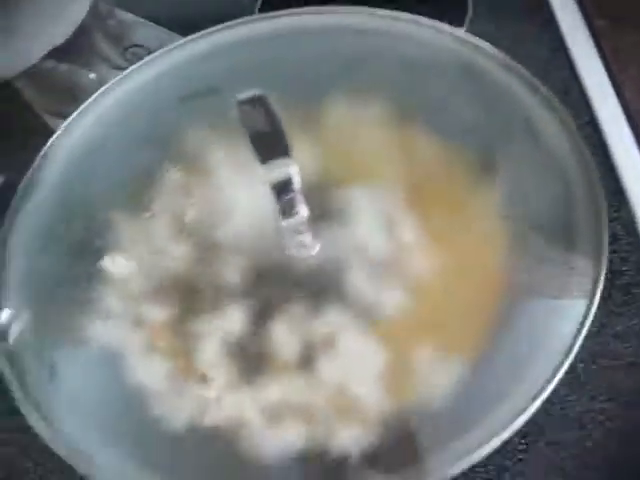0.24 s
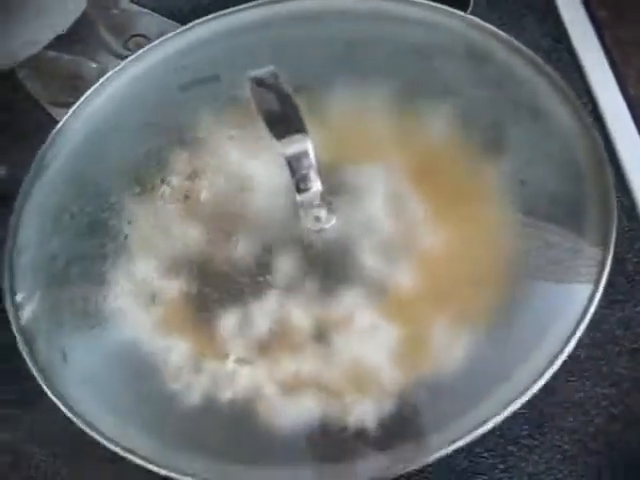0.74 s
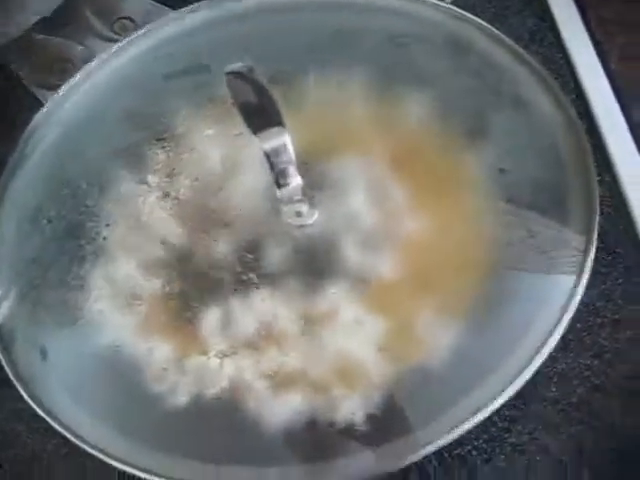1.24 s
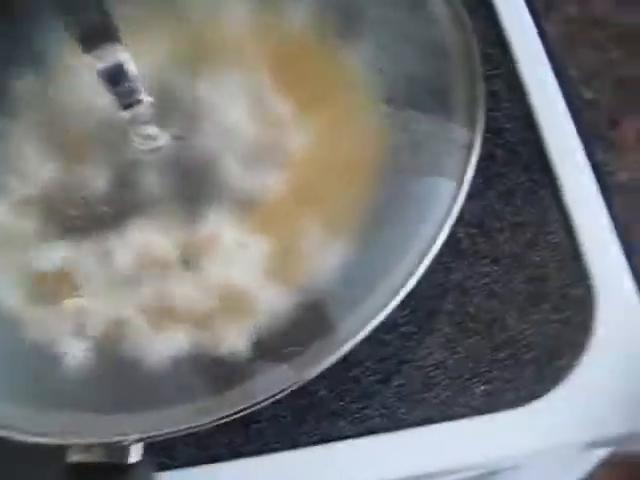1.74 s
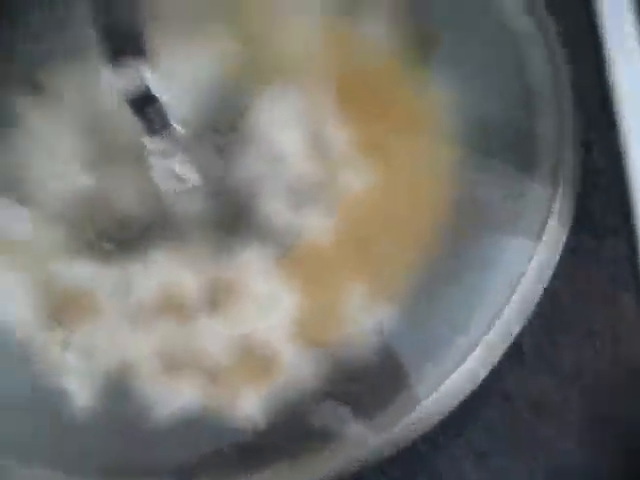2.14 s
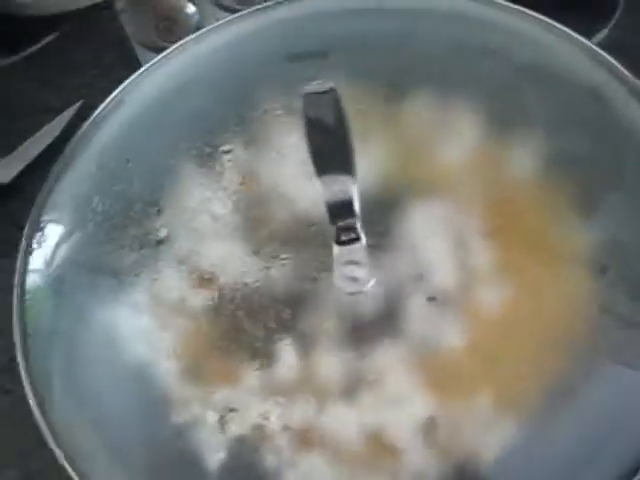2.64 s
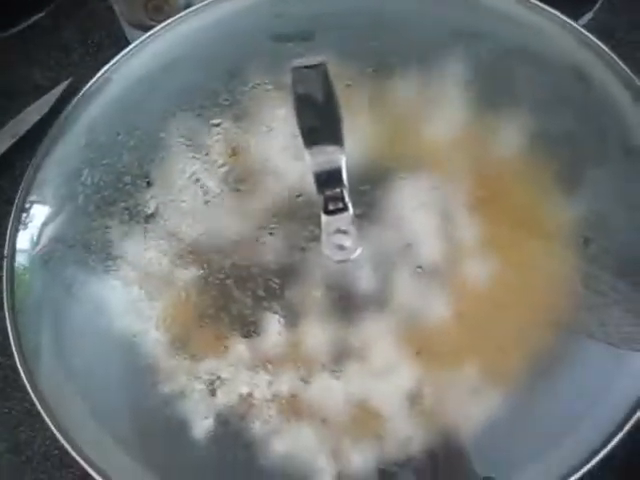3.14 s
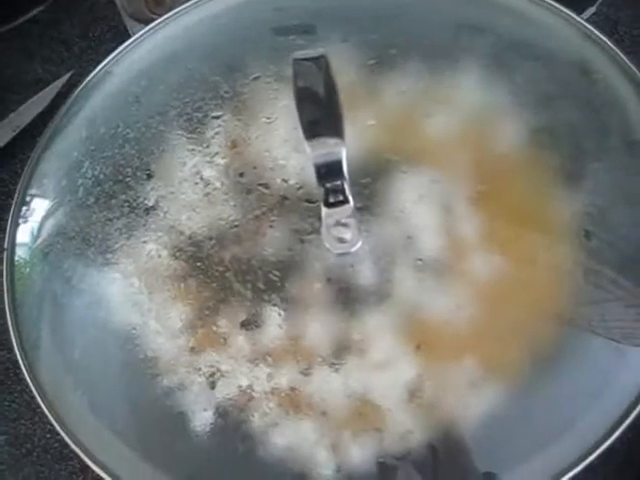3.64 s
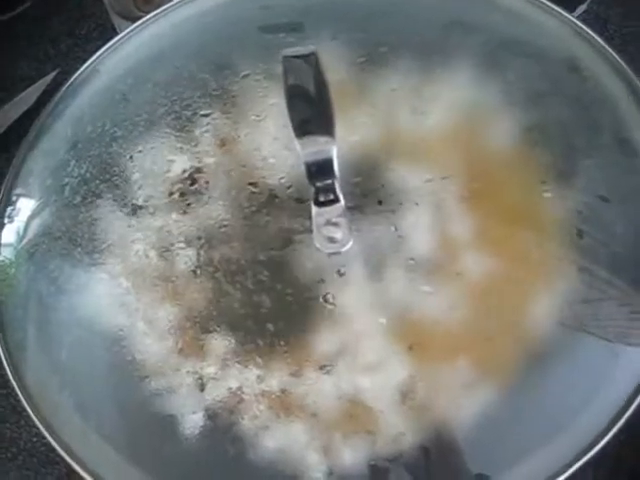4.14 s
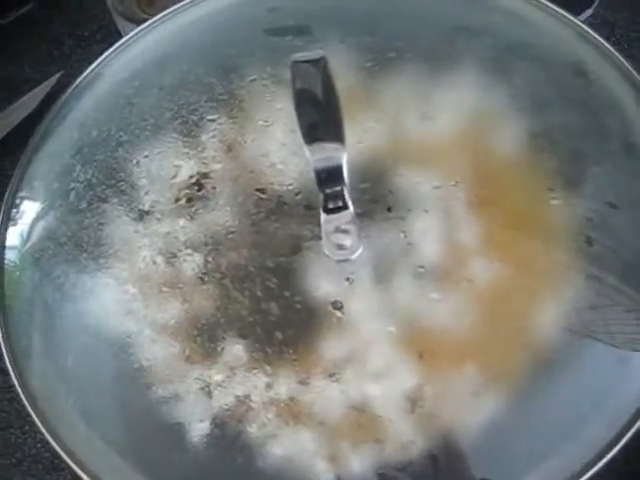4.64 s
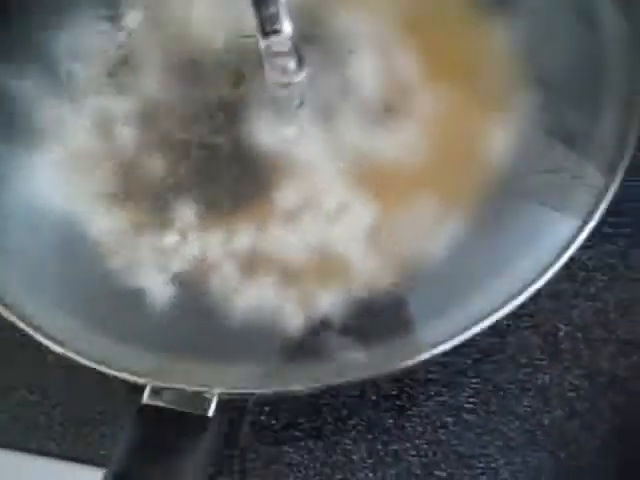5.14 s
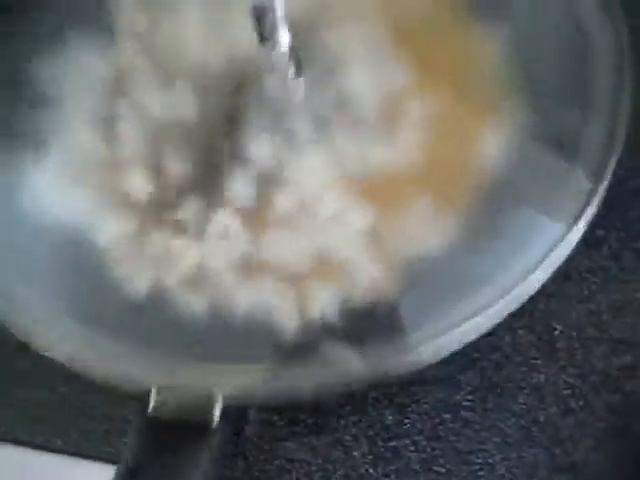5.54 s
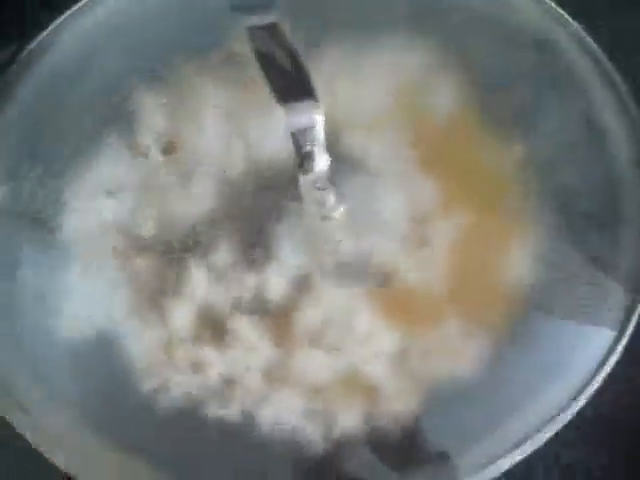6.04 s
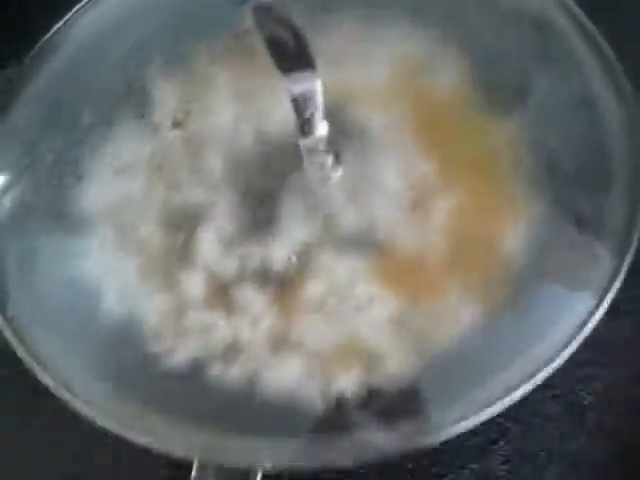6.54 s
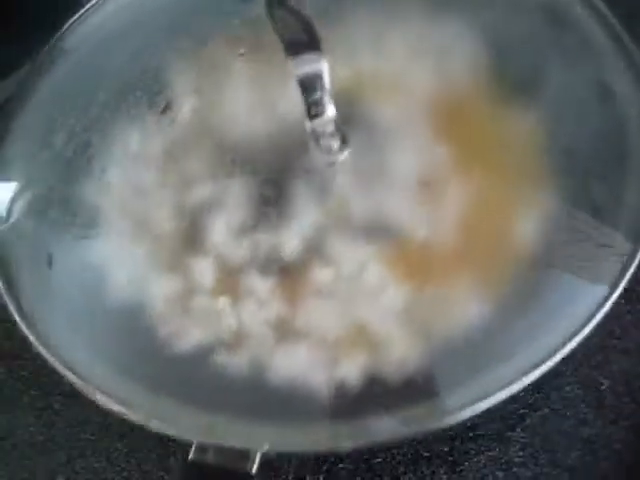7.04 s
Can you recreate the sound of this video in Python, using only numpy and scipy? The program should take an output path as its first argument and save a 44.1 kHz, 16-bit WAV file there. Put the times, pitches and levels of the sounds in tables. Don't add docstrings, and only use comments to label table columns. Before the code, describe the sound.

Popcorn bursts inside a lidded pan on a stove, heard very close in a small kitchen. Sharp dry pops and hard ticking knocks come in irregular clusters, with glassy lid rattle and brief metallic pings. The heap scrapes grainily as the pan is shaken, most heavily in the last two seconds. Thin oil hiss and very faint hum lie beneath, exposed during a lull around four and a half seconds. Loud hits sound slightly clipped.

```python
import sys
import numpy as np
from scipy import signal
from scipy.fft import rfft, irfft
from scipy.io import wavfile
from scipy.ndimage import uniform_filter1d

SR = 44100
rng = np.random.default_rng(int(sys.argv[2]) if len(sys.argv) > 2 else 0)


def convert_level_to_amplitude(level_db):
    exponent = np.asarray(level_db, float) / 20
    return 10 ** exponent


def waveform_to_disk(signal):
    frames = np.transpose(np.atleast_2d(signal))
    scaled = np.clip(frames, -1, 1) * 32767
    samples = np.round(scaled).astype(np.int16)
    wavfile.write(sys.argv[1], SR, samples)


N = 321930

# frequency in Hz, level in dB.
HISS_SPECTRUM = [(30, -4), (90, -4), (125, -5), (200, 0.5), (400, 3), (900, 1.5), (1700, -3.5), (3000, 1.5),
                 (6100, -2), (6700, -6), (7700, -5.5), (10800, -2), (11900, -9), (15500, -12)]
# frequency in Hz, level in dB.
STEADY_TONES = [(59.4, -59.5), (119.5, -67.5), (152, -75), (533, -60), (7560, -57), (7853, -58),
                (7882, -59)]
# start in seconds, peak in dB, pitch in Hz.
BASE_BUMPS = [(0.349, -44, 680), (5.169, -52, 297), (5.419, -36, 414), (5.689, -31, 637),
              (5.761, -39.5, 239), (5.911, -36, 218), (6.029, -34, 418), (6.349, -42, 437),
              (6.45, -48, 166), (6.908, -47, 230), (6.991, -40, 675)]
# peak time in seconds, half length in seconds, scrape in dB,
# centre in Hz, rumble of the base in dB.
HEAP_SLIDES = [(0.0, 0.16, -22, 1220, -44), (0.119, 0.076, -25, 1950, -50), (0.35, 0.2, -23.5, 1510, -38),
               (0.571, 0.12, -17.5, 1610, -57), (0.823, 0.097, -21.5, 1710, -57),
               (0.894, 0.043, -53, 1390, -63), (0.98, 0.11, -31.5, 1440, -45), (1.375, 1, -40, 1840, -64),
               (2.003, 0.29, -34, 1390, -50), (2.386, 0.072, -22.5, 1640, -41),
               (3.156, 0.042, -29, 1840, -45), (3.306, 0.12, -28.5, 1860, -39),
               (3.497, 0.18, -35, 2070, -51), (3.93, 0.11, -22.5, 1990, -51),
               (4.103, 0.2, -39.5, 1310, -48), (4.624, 0.11, -49, 1080, -69),
               (5.08, 0.083, -33.5, 1700, -52), (5.157, 0.062, -27.5, 1570, -43),
               (5.339, 0.17, -24.5, 1450, -34.5), (5.492, 0.17, -30.5, 1270, -38),
               (5.685, 0.16, -21.5, 1500, -37.5), (6.003, 0.48, -25.5, 1760, -38),
               (6.328, 0.2, -24.5, 1690, -35.5), (6.58, 0.14, -28, 1340, -41.5),
               (6.799, 0.095, -18.5, 1350, -31), (6.99, 0.054, -34.5, 1000, -36),
               (7.08, 0.12, -23, 1500, -36), (7.144, 0.07, -26, 1190, -37),
               (7.24, 0.081, -36.5, 2640, -47.5)]
# frequency in Hz, level in dB.
RATTLE_SPECTRUM = [(880, -4), (1500, -8.5), (2320, -2.5), (2930, -4), (3370, -3.5), (4340, -5),
                   (5930, -9.5), (12000, -30.5), (15600, -63), (22000, -120)]
# start in seconds, peak in dB, pitch in Hz.
KERNEL_TICKS = [(0.095, -6, 3000), (0.104, -6.5, 2130), (0.5056, -19, 1240), (0.5503, -17, 1190),
                (0.5596, -17, 1080), (0.604, -8, 1700), (2.3095, -14, 920), (2.393, -16, 2700),
                (2.404, -17, 2640), (2.4945, -24, 3000), (3.247, -10, 3920), (3.2716, -8, 2900),
                (3.299, -12, 2900), (3.392, -25, 2900), (3.8292, -9, 2230), (3.831, -10, 3600),
                (3.8965, -11, 2900), (3.909, -18, 2900), (3.9245, -15, 2220), (3.956, -14, 2870),
                (3.988, -23, 2550), (5.5406, -18.5, 1782), (5.617, -36, 1700), (5.622, -32, 1030),
                (5.661, -24, 1930), (5.6858, -16, 1780), (6.238, -13, 2400), (6.248, -13, 2370),
                (6.311, -21, 4220), (6.329, -24, 1380), (6.351, -13, 1980), (6.379, -19, 1890),
                (6.432, -24, 1800), (6.516, -15.5, 1270), (6.575, -23, 2010), (6.652, -19, 1750),
                (1.9765, -19.5, 2300), (1.966, -25, 945), (0.469, -20, 1510), (5.2625, -13, 3200),
                (5.364, -16, 2900), (3.2635, -32, 2080), (1.3, -16, 3000), (7.16, -19, 850),
                (7.177, -23, 2900)]
# start in seconds, peak in dB, main spot in Hz, second spot in
# Hz, 60 dB decay time in seconds.
HARD_KNOCKS = [(0.1504, 4, 2660, 1930, 0.02), (0.675, -9, 2620, 2130, 0.03), (0.678, 3, 2680, 1925, 0.052),
               (0.685, -6, 2200, 3560, 0.074), (0.695, -3, 2150, 2680, 0.065),
               (0.7005, -9, 2180, 2330, 0.05), (0.8252, 2, 1444, 1620, 0.042),
               (0.8265, -2, 895, 1457, 0.062), (1.311, -3.5, 1806, 2490, 0.058),
               (2.3718, -6, 2634, 2360, 0.071), (2.382, -3, 2610, 1680, 0.072),
               (3.2572, 3, 1930, 2050, 0.072), (3.276, -3, 1776, 2900, 0.056),
               (3.287, -3.5, 1405, 2830, 0.033), (3.451, 9, 1883, 2610, 0.021), (3.45, 0, 2700, 3740, 0.09),
               (6.0477, 10, 5150, 6100, 0.019), (6.05, 4, 5540, 2900, 0.02),
               (3.861, -8.5, 2830, 3690, 0.099), (3.913, -9, 1787, 2220, 0.19),
               (5.256, -9, 1810, 2660, 0.046), (5.718, 8, 2100, 2280, 0.02),
               (5.729, -1.5, 1486, 1990, 0.12), (5.759, -12.5, 1900, 2140, 0.19),
               (5.97, -0.5, 1860, 2750, 0.035), (6.12, -6, 2050, 4200, 0.02),
               (6.2255, -0.5, 1710, 2360, 0.025), (6.757, 2, 1815, 3400, 0.04)]
# start in seconds, peak in dB, main spot in Hz, second spot in Hz,
# clean ring in dB.
SOFT_BOUNCES = [(0.199, -9.5, 2010, 2080, -13), (0.798, -17, 1750, 2380, 7), (1.166, -11, 2140, 3200, -5),
                (1.45, -14, 1900, 1960, -21), (1.711, -6, 1580, 3040, -9.5), (2.412, -9, 1840, 2300, -2),
                (2.489, -11.5, 1600, 2960, 11), (3.02, -16, 2240, 2690, -4), (3.093, -8, 1930, 2900, -10),
                (3.152, -9.5, 2260, 2690, -5.5), (3.329, -10, 1890, 3720, -8), (3.83, -7.5, 2000, 3590, -7),
                (3.842, -6, 904, 3000, -5), (3.9466, -10, 2010, 2820, -8), (4.0552, -16.5, 1804, 2060, 10),
                (5.062, -24, 1440, 1830, 3), (5.181, -10.5, 1520, 2330, -14), (5.191, -17, 1400, 3500, -12),
                (5.291, -18, 2900, 3200, -5), (5.341, -8, 890, 2220, -2), (5.38, -10, 1820, 2110, -2),
                (5.394, -9, 920, 1800, -6), (5.419, -9, 1755, 2110, -4), (5.454, -13.5, 1787, 2550, 1),
                (6.297, -11, 1090, 2060, -2), (6.534, -12.5, 1350, 1350, -3), (6.599, -15.5, 1330, 2000, 1),
                (6.743, -5, 1720, 2450, -7), (6.783, -10.5, 1360, 2720, 8), (6.809, -15, 1210, 1970, -1),
                (6.825, -10.5, 1260, 2520, -9), (6.842, -10, 1960, 2550, -1), (6.92, -16.5, 900, 990, -1),
                (6.993, -19, 670, 1580, 1), (7.076, -17, 694, 2290, 7)]
# start in seconds, peak in dB, centre in Hz, width in Hz,
# 60 dB decay time in seconds.
FLAKE_SHOWERS = [(0.1507, -9, 5300, 2490, 0.062), (0.6745, -6, 2320, 900, 0.025),
                 (0.683, -10, 2370, 1100, .07), (0.694, -7, 2150, 700, 0.064),
                 (0.8243, -12, 1300, 500, 0.043), (0.833, -15, 1440, 400, 0.072),
                 (2.0754, -7.5, 2000, 900, 0.046), (2.076, -20, 5530, 1800, 0.036),
                 (2.189, -13, 3820, 1000, 0.095), (2.200, -18, 3100, 1200, 0.13),
                 (3.242, -17, 3870, 500, 0.029), (3.27, -10, 3270, 1300, .06), (3.291, -19, 2800, 900, .09),
                 (3.3117, -13.5, 11300, 2500, 0.033), (3.3135, -20, 4750, 700, 0.12),
                 (3.862, -14, 2500, 1190, 0.088), (3.909, -15, 2300, 1300, 0.061),
                 (3.946, -21, 2400, 1300, .05), (5.229, -8, 3000, 2000, .06),
                 (5.257, -10, 2570, 1300, 0.052), (5.718, -5.5, 3300, 1510, 0.081),
                 (5.723, -1, 2200, 600, .02), (6.0488, -3.5, 3770, 900, 0.02),
                 (6.0529, -5, 4300, 2500, 0.02), (6.054, -16, 5600, 450, 0.17),
                 (6.057, -15, 2820, 1500, 0.13), (6.119, -13, 3000, 2000, 0.06),
                 (3.393, -27, 7000, 5000, .05), (6.2065, -22, 3000, 300, .05),
                 (6.225, -0.5, 2100, 880, 0.018), (6.228, -3, 2090, 900, .02),
                 (1.458, -21, 2500, 700, 0.092), (2.190, -20, 916, 120, 0.089),
                 (6.229, -26, 5600, 400, .05), (3.2763, -18, 2000, 500, .03),
                 (0.265, -9.5, 3000, 1500, .04)]
# frequency in Hz, level in dB, 60 dB decay time in seconds.
PAN_MODES = [(1930, -14, 0.23), (2220, -28, 0.21), (2370, -8, 0.35), (2660, -6, 0.22), (2830, 2, 0.2),
             (3530, -6, 0.21), (3720, -2, 0.12), (4540, -14, 0.3), (4530, -15, 0.3)]
# start in seconds, whole pan in dB, favoured line in Hz,
# its level in dB, its 60 dB decay time in seconds.
PAN_RINGS = [
    (0.15, -13.5, 1960, -21, 0.047),
    (0.824, -54, 1410, -14.5, 0.078),
    (1.312, -35, 1853, -13, 0.046),
    (1.45, -45, 1890, -10.5, 0.048),
    (3.27, -13, 1910, -35, 0.33),
    (3.452, -7.5, 1912, -21, 0.25),
    (5.257, -33, 1930, -7, 0.041),
    (6.052, -42, 5750, -36, .1),
    (6.233, -30, 2440, -15.5, 0.16),
]
# frequency in Hz, level in dB, 60 dB decay time in seconds.
LID_MODES = [(901, 12.5, 0.057), (1437.5, 12, 0.049), (1960, -1, 0.064), (2372, -3, 0.12),
             (2900, -3, 0.083), (3000, 3, 0.099), (3200, -6.5, 0.12), (3500, -4, 0.18), (3770, 2.5, 0.083),
             (4058, 2, 0.082), (4630, -2, 0.069), (5470, -4.5, 0.19), (6140, -5.5, 0.18)]
# frequency in Hz, level in dB.
BURST_SPECTRUM = [(300, -37), (700, -5.5), (1200, -16), (2000, 1.5), (3000, -2), (4500, -1.5), (6500, -17),
                  (9000, -29)]
# frequency in Hz, level in dB.
CRACK_SPECTRUM = [(3000, -25), (5000, 13.5), (7000, 7), (10500, 2), (12500, 0), (15500, -77)]
# start in seconds, peak in dB, favoured pitch in Hz,
# thump in dB, crack in dB.
DEEP_BURSTS = [(0.0859, -4, 3110, -23.5, -26), (0.4098, -11.5, 2920, -19.5, -13.5),
               (0.4689, -7, 1450, -24.5, -13), (0.655, -15, 852, -18.5, -18),
               (1.142, -15.5, 2315, -22, -22), (1.8802, -16.5, 1410, -16, -11.5),
               (2.304, -14, 3840, -20, -15), (2.3476, -6.5, 3050, -22.5, -15.5),
               (2.433, -14.5, 950, -18.5, -17), (2.47, -6, 2490, -13.5, -19), (3.064, -13.5, 899, -16, -19),
               (3.2425, -3.5, 2280, -22, -23.5), (3.4351, -12.5, 1285, -20, -17),
               (3.7612, -20.5, 850, -21, -13.5), (3.782, -17.5, 930, -30, -18),
               (3.822, -13.5, 2310, -16.5, -11.5), (3.9782, -9, 2395, -23, -23),
               (5.356, -6, 3000, -20.5, -12), (5.891, -20, 1800, -14, -34),
               (5.9502, -5.5, 3000, -17.5, -14), (6.027, -15, 2220, -19, -30),
               (6.2067, -16.5, 2880, -9.5, -16), (6.794, -22, 3500, -9, -5)]
# start in seconds, peak in dB, favoured pitch in Hz,
# crack in dB, ring of the lid in dB.
DRY_BURSTS = [(0.1502, -9.5, 3000, -22, -10), (0.2648, -9.5, 3160, -18.5, -2), (0.775, -18, 1960, -21, 0),
              (1.057, -11.5, 2915, -9, 5), (1.2897, -3.5, 3000, -17.5, -6), (1.4222, -6.5, 2370, -12, -3),
              (1.555, -21, 2700, -16, 4), (1.6761, -13.5, 1450, -12.5, -2.5), (1.7012, -7, 2660, -18.5, 0),
              (1.7619, -18.5, 1380, -24, -7), (2.0752, -13, 988, -18.5, 4), (2.1897, -10.5, 954, -10.5, -1),
              (2.5, -16.5, 1590, -17, -2), (2.592, -19.5, 3540, -11.5, 11), (3.313, -14.5, 4710, -6, 6),
              (3.6037, -23.5, 1940, -25, -6), (3.889, -3.5, 2410, -17, 1), (4.1683, -21.5, 3120, -24, -2),
              (4.3812, -32.5, 5910, -2.5, 8), (4.468, -7.5, 3000, -12.5, 4.5),
              (5.2293, -8.5, 4440, -16, 1.5), (5.3143, -3.5, 1730, -33, 3), (6.0484, -8, 3780, -14.5, -13),
              (6.4789, -15.5, 4750, -11.5, -3), (6.714, -1.5, 2410, -26, -1.5)]


def read(points, hz):
    f, value = np.transpose(points)
    return np.interp(np.log(hz + 1), np.log(f + 1), value)


def evened(x):
    return x / np.sqrt(np.mean(x ** 2) + 1e-20)


def peaked(x):
    return x / np.max(abs(x))


def add(mix, s, sound):
    part = mix[round(s * SR):][:len(sound)]
    part += sound[:len(part)]


def decay(t, t60):
    return convert_level_to_amplitude(-60 * t / t60)


def onset(t, rise):
    return 1 - np.exp(-t / rise)


def coloured(x, points):
    gain = convert_level_to_amplitude(read(points, np.fft.rfftfreq(len(x), 1 / SR)))
    return evened(irfft(rfft(x) * gain, len(x)))


def resonate(x, hz, width):
    turn = np.exp(2j * np.pi * np.cumsum(hz * np.ones(len(x))) / SR)
    r = np.exp(-np.pi * width / SR)
    return 2 * (turn * signal.lfilter([1 - r], [1, -r], x / turn)).real


def grains(per_s, spread_db):
    size = convert_level_to_amplitude(spread_db * np.minimum(rng.exponential(1, N), 4))
    return size * rng.standard_normal(N) * (rng.random(N) < per_s / SR)


def ring(modes, t, strike_db, stretch, phase):
    hz, db, t60 = np.transpose(modes)[:, :, None]
    tones = np.sin(2 * np.pi * (hz * t + phase[:, None]))
    return (convert_level_to_amplitude(db + strike_db[:, None]) * decay(t, t60 * stretch) * tones).sum(0)


def stove():
    t = np.arange(N) / SR
    bubbles = grains(1400, 5.1)
    hiss = convert_level_to_amplitude(-42.5) * coloured(rng.standard_normal(N) + 0.58 * bubbles, HISS_SPECTRUM)
    waver = 1 + 0.16 * evened(uniform_filter1d(rng.standard_normal((len(STEADY_TONES), N)), 3000))
    hz, db = np.transpose(STEADY_TONES)[:, :, None]
    return hiss + np.sqrt(2) * (convert_level_to_amplitude(db) * waver * np.sin(2 * np.pi * hz * t)).sum(0)


def kitchen(x):
    t = np.arange(12000) / SR
    noise = rng.standard_normal(len(t))
    low = signal.sosfilt(signal.butter(2, [300, 3000], "band", fs=SR, output="sos"), noise)
    high = signal.sosfilt(signal.butter(2, 3000, "high", fs=SR, output="sos"), noise)
    tail = (low * decay(t, 0.42) + 0.78 * high * decay(t, 0.25)) * (t > .004)
    return signal.fftconvolve(x, tail / np.linalg.norm(tail[:2000]))[:N]


def bumps():
    out = np.zeros(N)
    for s, db, hz in BASE_BUMPS:
        cycles = np.arange(4096) / SR * hz
        jolt = np.sin(2 * np.pi * cycles) * cycles * decay(cycles, 11.6)
        add(out, s, convert_level_to_amplitude(db + 12) * peaked(jolt))
    return out


def slides(peak_db, rest_db, lag_s):
    s, half = np.transpose(HEAP_SLIDES)[:2, :, None]
    away = abs(np.arange(0, N + 256, 256) / SR - s - lag_s) / half
    drop_db = 20 * away
    return convert_level_to_amplitude(2 * (peak_db[:, None] - drop_db)) + convert_level_to_amplitude(2 * rest_db) / len(s)


def shake():
    scrape_peak_db, slide_hz, base_db = np.transpose(HEAP_SLIDES)[2:]
    heap = slides(scrape_peak_db, -50.5, 0)
    base = slides(base_db, -83, 0.0033)
    columns = 10 * np.log10(heap.sum(0)), slide_hz @ heap / heap.sum(0), 10 * np.log10(base.sum(0))
    scrape_db, centre_hz, rumble_db = (np.interp(np.arange(N) / 256, np.arange(len(c)), c) for c in columns)
    rattle_db = -12.5 + 0.78 * scrape_db
    scrape, t = np.zeros(N), np.arange(1024) / SR
    for hz in np.geomspace(420, 4200, 17):
        note = np.sin(2 * np.pi * hz * t) * decay(t * hz, 22) * onset(t * hz, 0.5)
        share = convert_level_to_amplitude(-5.5 * np.log2(hz / centre_hz) ** 2)
        scrape += signal.oaconvolve(share * grains(600, 0.52), note / np.linalg.norm(note))[:N]
    lumps = convert_level_to_amplitude(2.14 * evened(uniform_filter1d(rng.standard_normal(N), 500)))
    rattle = coloured(grains(4000, 2.0), RATTLE_SPECTRUM)
    slips = grains(350, 2.6)
    rumble = evened(sum(resonate(resonate(slips, hz, 73), hz, 220) for hz in (200, 257, 300, 408)))
    mix = convert_level_to_amplitude(scrape_db - 4.5) * evened(scrape) + convert_level_to_amplitude(rattle_db) * rattle + convert_level_to_amplitude(rumble_db - 2.5) * rumble
    return lumps * mix


def ticks():
    out, t = np.zeros(N), np.arange(2048) / SR
    for s, db, hz in KERNEL_TICKS:
        puff = evened(resonate(rng.standard_normal(len(t)), hz, 160))
        note = np.sin(2 * np.pi * hz * t) + 0.5 * puff
        add(out, s - .0005, convert_level_to_amplitude(db - 7.0) * peaked(note * decay(t, 0.07) * onset(t, 0.00022)))
    return out


def showers():
    out, t = np.zeros(N), np.arange(4096) / SR
    for s, db, hz, width, t60 in FLAKE_SHOWERS:
        noise = rng.standard_normal(len(t))
        patch = resonate(resonate(noise, hz, width), hz, 1.04 * width)
        add(out, s - .0005, convert_level_to_amplitude(db) * peaked(patch * decay(t, t60) * onset(t, 0.00029)))
    return out


def knocks():
    out, t = np.zeros(N), np.arange(8192) / SR
    hard = [(*row, -0.5) for row in HARD_KNOCKS]
    soft = [(s, db, main_hz, second_hz, 0.061, clean_db) for s, db, main_hz, second_hz, clean_db in SOFT_BOUNCES]
    for s, db, main_hz, second_hz, t60, clean_db in hard + soft:
        noise = rng.standard_normal(len(t))
        wander = 0.053 * np.cumsum(noise)
        spots = np.sin(2 * np.pi * main_hz * t + wander) + 0.79 * np.sin(2 * np.pi * second_hz * t - wander)
        blur = convert_level_to_amplitude(-0.8 * clean_db)
        wake = evened(sum(resonate(resonate(noise, hz, 360 * blur), hz, 530 * blur) for hz in (main_hz, second_hz)))
        dull = evened(resonate(coloured(noise[::-1], BURST_SPECTRUM), 1900, 1760))
        tick = dull * (decay(t, 0.013) + 0.35 * decay(t, t60))
        body = convert_level_to_amplitude(clean_db) * spots * decay(t, 1.13 * t60)
        body += 0.5 * wake * decay(t, 1.25 * t60) + 0.41 * tick
        add(out, s - .0005, convert_level_to_amplitude(db - 5.5) * peaked(body * onset(t, 0.00028)))
    return out


def rings():
    out, t = np.zeros(N), np.arange(24000) / SR
    for s, pan_db, hz, line_db, t60 in PAN_RINGS:
        strike, phase = rng.random((2, len(PAN_MODES)))
        flicker = 1 + 0.25 * evened(uniform_filter1d(rng.standard_normal(len(t)), 500))
        line = flicker * (np.sin(2 * np.pi * hz * t) + 0.39 * np.sin(2 * np.pi * (hz - 28) * t))
        pan = flicker[::-1] * peaked(ring(PAN_MODES, t, -4 * strike, 1.0, phase))
        add(out, s, (convert_level_to_amplitude(pan_db) * pan + convert_level_to_amplitude(line_db) * line * decay(t, t60)) * onset(t, 0.00075))
    return out


def pops():
    out, t = np.zeros(N), np.arange(8192) / SR
    lid_hz = np.transpose(LID_MODES)[0]
    deep = [(*row, 0.094, 4.5) for row in DEEP_BURSTS]
    dry = [(s, db, hz, -27.5, crack_db, 0.13, lid_db) for s, db, hz, crack_db, lid_db in DRY_BURSTS]
    for s, db, hz, thump_db, crack_db, t60, lid_db in deep + dry:
        t60 *= convert_level_to_amplitude(0.051 * (crack_db - 1.0) - 0.057 * (db + 27.0))
        steam, flakes = rng.standard_normal((2, len(t)))
        strike, phase = rng.random((2, len(LID_MODES)))
        rise = onset(t, 0.0001 + 0.0086 * convert_level_to_amplitude(thump_db + 12.0))
        fall = 1.5 * decay(t, 0.0062) + 0.62 * decay(t, 0.017)
        fall += 0.5 * decay(t, 0.43 * t60) + 0.36 * decay(t, 1.7 * t60)
        broad = coloured(steam, BURST_SPECTRUM)
        burst = peaked((3.3 * broad + 0.5 * evened(resonate(broad, hz, 560))) * fall * rise)

        near_db = -5 * abs(np.log2(lid_hz / hz)) - 8 * strike
        flicker = 1 + 0.35 * evened(uniform_filter1d(flakes, 150))
        detuned_t = t * (1 + 0.02 * (rng.random() - 0.5))
        lid = peaked(flicker * ring(LID_MODES, detuned_t, near_db, t60 / 0.076, phase))
        spot = np.sin(2 * np.pi * hz * t) * decay(t, 0.6 * t60)
        body = peaked(burst + convert_level_to_amplitude(lid_db) * (lid + 0.5 * spot) * rise)

        air_hz = np.array([[165], [260]]) * (1.067 + 0.029 * rng.random((2, 1)))
        thump = peaked(np.sin(2 * np.pi * air_hz * t).sum(0) * decay(t, 0.017) * onset(t, 0.0028))
        crack = peaked(coloured(flakes, CRACK_SPECTRUM) * decay(t, 0.047) * rise)
        pop = convert_level_to_amplitude(-0.5) * body + convert_level_to_amplitude(thump_db + 9.5) * thump + convert_level_to_amplitude(crack_db + 7.5) * crack
        add(out, s - .001, convert_level_to_amplitude(db) * pop)
    return out


def scene():
    pan = pops() + knocks() + rings() + shake() + bumps() + ticks() + showers()
    pan = signal.sosfilt(signal.butter(3, 115, "high", fs=SR, output="sos"), pan)
    return (pan + convert_level_to_amplitude(-14.5) * kitchen(pan) + stove())[None]


def roll_off(x):
    return signal.sosfilt(signal.butter(12, 15820, fs=SR, output="sos"), x)


def record(dry):
    peak_db = 20 * np.log10(abs(dry[0]) + 1e-6)
    fall_db = np.arange(N) * 200. / SR
    over_db = np.maximum(np.maximum.accumulate(peak_db + fall_db) - fall_db + 7.5, 0)
    late_db = np.roll(uniform_filter1d(over_db, 120), 190)
    heard = np.clip(dry / convert_level_to_amplitude(0.56 * late_db), -0.89, 0.89)
    band_limit = signal.firwin(511, 15600, window=("kaiser", 9), fs=SR)
    heard = signal.oaconvolve(heard, band_limit[None], "same")
    top = heard - signal.oaconvolve(heard, signal.firwin(255, 13000, fs=SR)[None], "same")
    loud_db = np.maximum(np.maximum.accumulate(peak_db + 3 * fall_db) - 3 * fall_db + 12, 0)
    dropped = np.clip(uniform_filter1d(loud_db, 600) / 1.5, 0, 1)
    return roll_off(heard - dropped * top)


dry = scene()
out = record(dry)
waveform_to_disk(out)
```